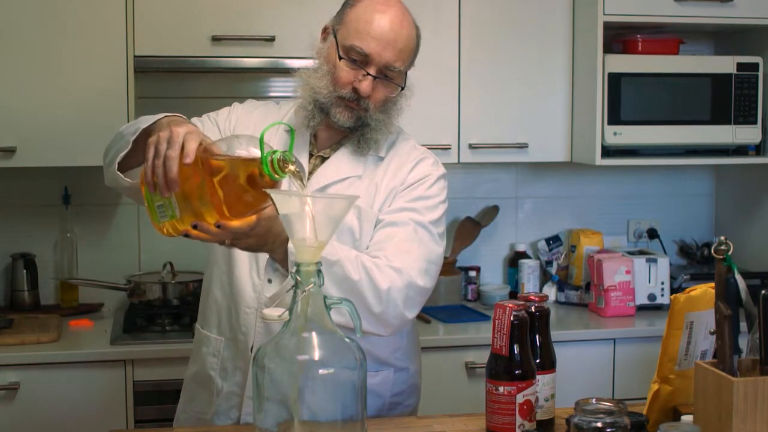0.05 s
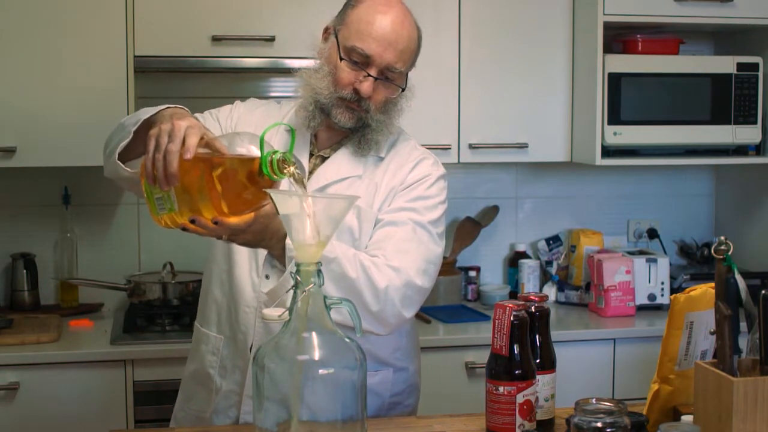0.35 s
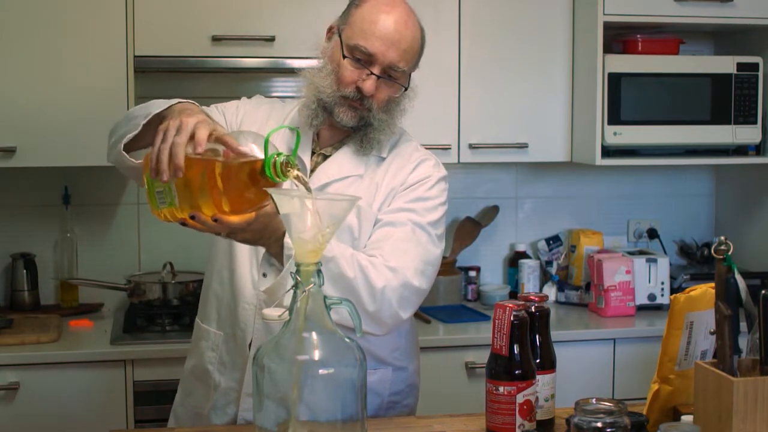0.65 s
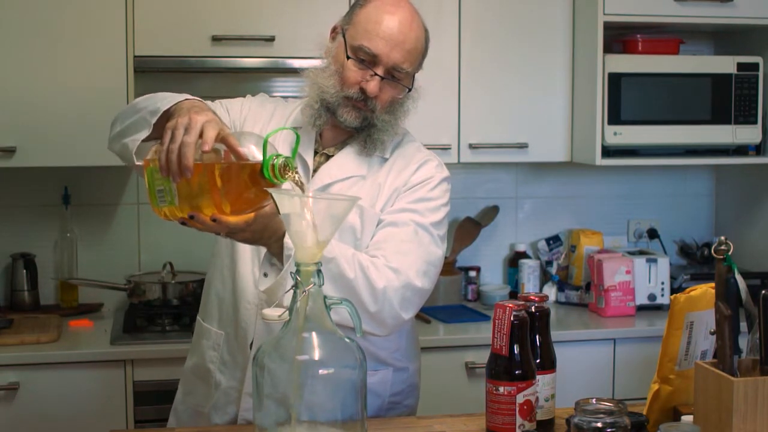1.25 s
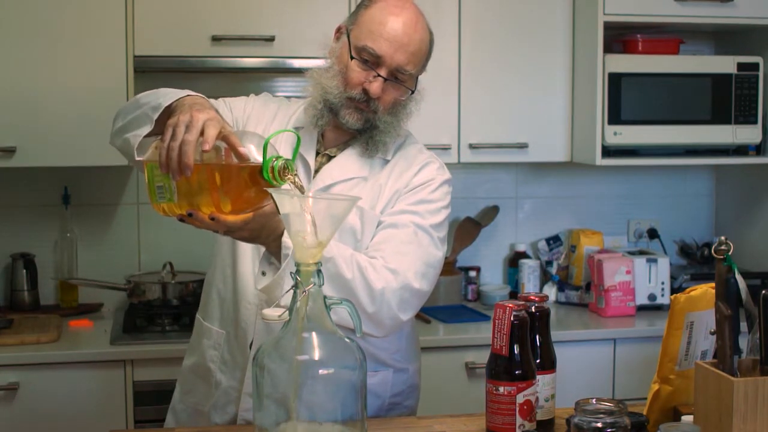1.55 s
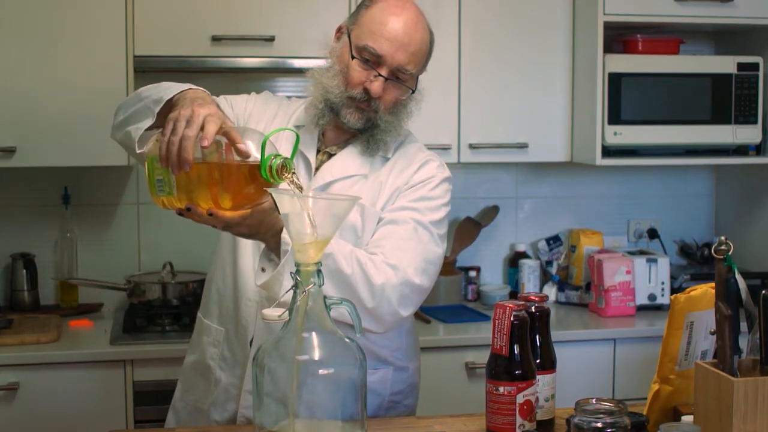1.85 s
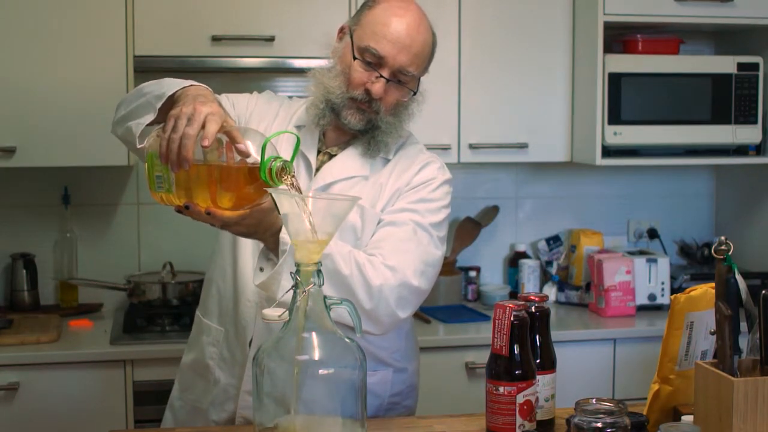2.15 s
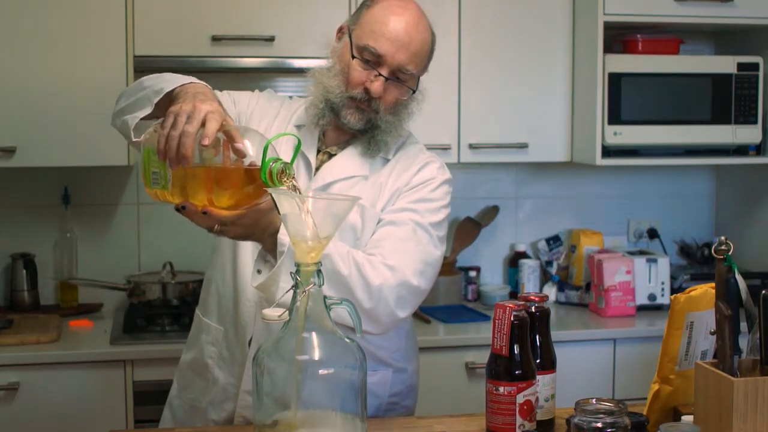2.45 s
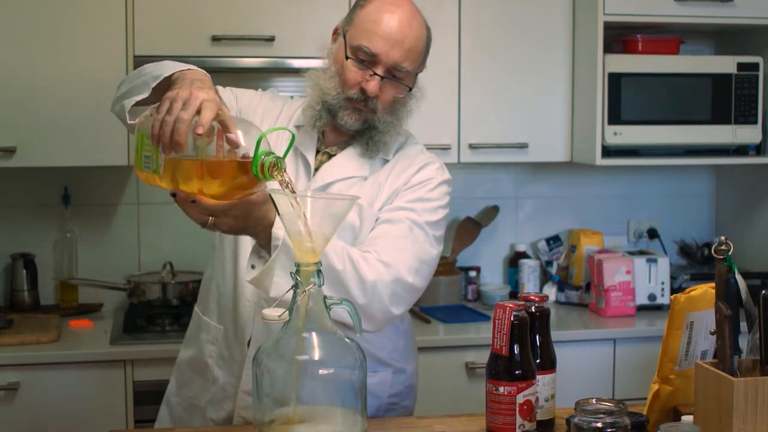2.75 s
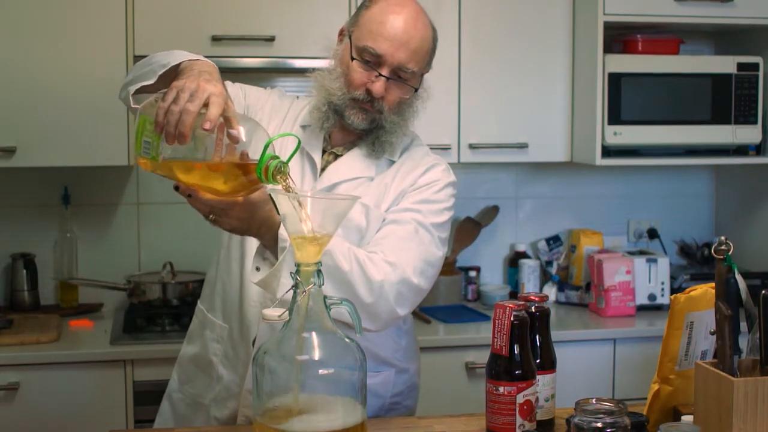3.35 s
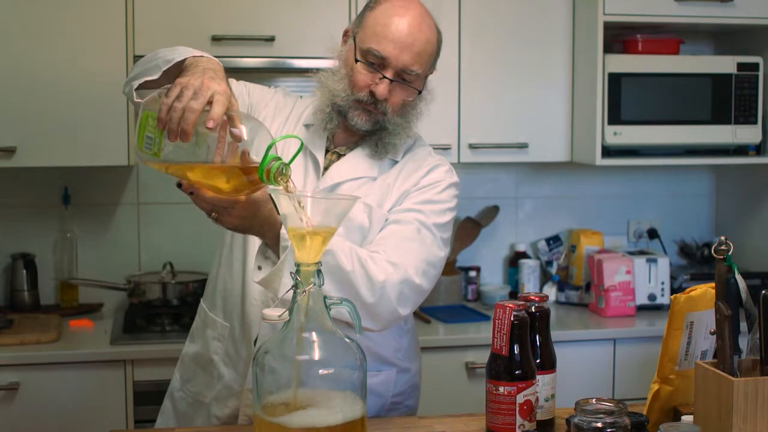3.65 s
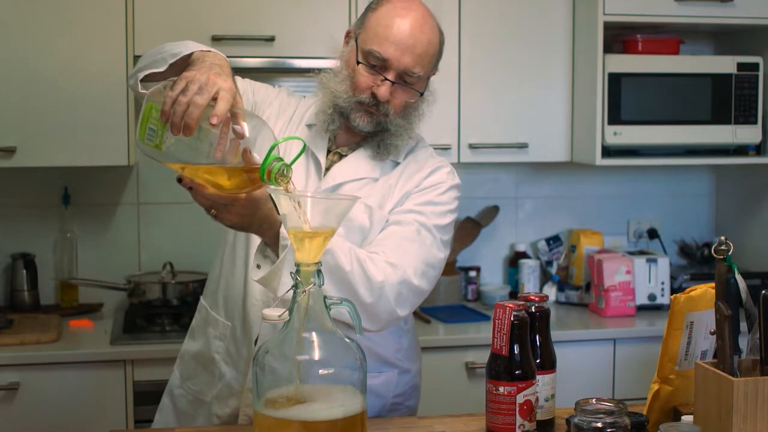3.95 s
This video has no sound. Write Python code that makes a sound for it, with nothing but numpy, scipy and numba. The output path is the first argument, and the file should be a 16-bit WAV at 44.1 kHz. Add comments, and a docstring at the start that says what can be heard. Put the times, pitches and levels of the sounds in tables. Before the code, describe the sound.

Liquid gurgles hollowly through a plastic funnel into a glass jug, with light splashing.

```python
"""A kitchen, heard by two spaced microphones: juice pours from a bottle through a plastic funnel
into a big glass jar. The stream drags air into the pool in the funnel, where large bubbles gulp and
churn, deeper as the pool grows, and ring the hollow air resonances. Splash and fizz ride on top,
dotted with plinks, spatters and one dry click. They die down as the jar fills and a thin trickle
comes through. A low thrum sits under it all."""
import sys
import numpy as np
from scipy import signal
from scipy.fft import rfft, irfft
from scipy.io import wavfile
from scipy.ndimage import uniform_filter1d, map_coordinates
from numba import njit

SR = 44100
rng = np.random.default_rng(int(sys.argv[2]) if len(sys.argv) > 2 else 0)


def inscribe(sig):
    """Save sig as 16-bit PCM at rate SR to the path in sys.argv[1].

    A 1-D sig is mono; a 2-D sig holds one channel per row.
    Samples are clipped to [-1, 1] before scaling.
    """
    pcm = np.round(np.clip(np.atleast_2d(sig).T, -1, 1) * 32767)
    wavfile.write(sys.argv[1], SR, pcm.astype(np.int16))


N = 176400

# Churn of the pool in the funnel: time_s, level_db, pitch_hz
POOL_CHURN = [(0, -37.5, 258), (.35, -39.5, 274), (.7, -29, 290), (1.15, -29.5, 278.5), (1.45, -28, 259),
              (1.9, -27, 230), (2.55, -23.5, 227), (2.85, -30, 192), (3.3, -30, 185.5), (4, -30.5, 193)]
# Air resonances of jar and surroundings, with the start and end level of the stream's own ring:
# pitch_hz, width_hz, left_db, right_db, start_db, end_db
AIR_MODES = [(174.2, 3.7, -6, -3, -43.5, -26), (250.3, 8.9, 0, -5.5, -26.5, -31),
             (370.4, 35.6, -8.5, 1, -44.5, -36)]
# Fader for the burble of mid-sized bubbles: time_s, level_db
BURBLE_FADER = [(0, -43.5), (.3, -39.5), (.8, -36.5), (1.12, -40.5), (1.5, -38.5), (2.1, -40.5),
                (2.85, -41.5), (4, -42)]
# Faders for the fine spray: time_s, splash_db, fizz_db
SPRAY_FADERS = [(0, -31.5, -44.5), (.12, -38, -49), (.4, -35, -48.5), (.55, -41.5, -50), (.75, -39.5, -49),
                (.95, -39, -48.5), (1.08, -44, -53), (1.2, -44.5, -53.5), (1.35, -35, -47.5),
                (1.5, -43.5, -54), (1.79, -39.5, -51), (1.9, -35, -50.5), (2.02, -40, -51.5),
                (2.42, -43, -55.5), (2.8, -43, -54), (2.92, -47, -54), (3.3, -53, -57.5), (4, -61, -58.5)]
# Tone of the burble, the splash and the fizz: frequency_hz, gain_db
BURBLE_EQ = [(300, 20.5), (450, -5.5), (550, 0.5), (700, -1.5), (900, -7), (1200, -11.5), (1600, -18.5),
             (2200, -11), (3000, -25)]
SPLASH_EQ = [(700, 28.5), (900, 0), (1150, -9), (1700, -3.5), (2150, -0.5), (2550, -4), (3100, -4),
             (3500, -2), (4100, -11.5), (5400, -13), (6400, -18.5), (8000, -5)]
FIZZ_EQ = [(4500, -1), (6300, -11.5), (8000, -7), (10000, -7.5), (12500, -12.5), (15500, -19)]
# Cavity resonances that colour the splashing: pitch_hz
CAVITY_MODES = [446, 559, 619, 866, 970, 1117, 1337, 1470, 1970, 2190]
# Tone of the falling liquid's thrum and of the quiet kitchen: frequency_hz, gain_db
THRUM_EQ = [(20, -7), (45, 1.5), (72, 13), (90, 5), (125, 11.5), (170, 8), (300, -39)]
ROOM_TONE_EQ = [(20, 2), (100, 7), (500, -1), (2000, -16.5), (6000, -28), (16000, -55)]
# Drops hitting the funnel: peak_s, level_db, centre_hz, decay_s
SPATTER_HITS = [(0.011, -27.5, 1410, 0.016), (.29, -47, 1700, 0.025), (.38, -48.5, 3250, 0.083),
                (1.795, -37, 5900, 0.0072), (1.922, -31, 1070, 0.027), (1.932, -32, 4400, 0.013),
                (2.85, -33.5, 3960, 0.018), (2.976, -36, 890, 0.0064), (3.604, -24.5, 700, 0.0021)]
# Bunches of clear bubbles: start_s, level_db, pitch_hz
PLINK_BUNCHES = [(.165, -27, 1400), (.293, -26, 2150), (.822, -25.5, 1526), (.99, -30, 1586),
                 (1.925, -23, 1950), (2.108, -34.5, 2140), (2.22, -32, 5500), (2.848, -33.5, 4920),
                 (3.866, -35, 1390)]
# Big gulps of air, positive pan to the left: peak_s, level_db, pitch_hz, pan_db
AIR_GULPS = [(.439, -23, 257, 3), (.464, -19.5, 290, 2), (0.718, -18.5, 260, 4), (.768, -8.5, 350, -4),
             (.814, -16, 262, 5), (0.942, -16, 265, 12), (0.968, -15.5, 257, 3), (1.01, -16, 322, 9),
             (1.247, -16.5, 335, -3), (1.316, -10, 270, 4), (1.337, -12.5, 267, 1), (1.397, -10, 250, 6),
             (1.443, -17, 242, 9), (1.479, -12.5, 234, 19), (1.498, -12.5, 232, 3), (1.536, -12, 265, 2),
             (1.548, -14.5, 252, 5), (1.57, -6.5, 265, 5.5), (1.652, -9.5, 253, 2.5),
             (1.732, -14.5, 246, 3), (1.794, -11, 248, 0), (1.816, -12, 259, 6), (1.832, -21, 254, -8),
             (1.885, -15, 230, 12), (1.913, -10, 235, 6), (1.967, -16.5, 235, 18), (2.035, -7.5, 237, 6),
             (2.061, -3, 248, 3), (2.148, -14, 245, 4), (2.245, -9, 252, 18), (2.297, -14.5, 245, 4),
             (2.308, -11.5, 254, 16), (2.352, -19.5, 250, -9), (2.391, -13, 250, 12),
             (2.432, -14.5, 237, 10), (2.467, -8.5, 257, 5), (2.481, -13, 251, 0), (2.522, -16.5, 252, 7),
             (2.568, -6, 250, -2), (2.696, -10, 246, 3), (2.977, -22.5, 235, -8), (3.038, -20.5, 208, 1),
             (3.085, -17, 224, -5), (3.156, -13, 244, 10), (3.253, -14, 245, 4), (3.324, -16, 253, -2),
             (3.374, -15.5, 256, 7), (3.402, -19.5, 243, 7), (3.542, -26, 239, 11), (3.694, -17, 236, -6),
             (3.752, -19.5, 215, -17)]
# Fader for the trickle in the jar: time_s, level_db
TRICKLE_FADER = [(2, -67), (2.7, -54), (3.3, -48.5), (4, -58)]


def undb(db):
    """Decibels to gain."""
    return 10 ** (np.asarray(db) / 20)


def unit(x):
    """Scale to rms 1."""
    return x / np.sqrt(np.mean(x ** 2))


def curve(table, t, column=1):
    """One column of a table, joined by straight lines."""
    rows = np.array(table)
    return np.interp(t, rows[:, 0], rows[:, column])


def wobble(per_s):
    """Random levels, smoothly joined; spread near 1."""
    hold = max(int(SR / per_s), 1)
    steps = rng.standard_normal(N)
    return 1.2 * uniform_filter1d(steps[np.arange(N) // hold], hold)


def equalise(x, points):
    """Shape the tone with an EQ curve, then scale to rms 1."""
    hz, db = np.array(points).T
    bins_hz = np.maximum(np.arange(N + 1) * SR / (2 * N), 1)
    gain = undb(np.interp(np.log(bins_hz), np.log(hz), db))
    return unit(irfft(rfft(x, 2 * N) * gain)[..., :N])


def resonate(x, hz, width_hz):
    """Two-pole resonance, gain 1 at the centre."""
    return signal.lfilter(*signal.iirpeak(hz, hz / width_hz, fs=SR), x)


def noise_band(hz, first_width_hz, second_width_hz):
    """Stereo noise through two resonances in series, at rms 1."""
    band = resonate(rng.standard_normal((2, N)), hz, first_width_hz)
    return unit(resonate(band, hz, second_width_hz))


def room(x, wet_db, t60_s=0.5, predelay_s=0.001435):
    """Add the kitchen's reflections, different at each microphone."""
    t = np.arange(SR // 2) / SR
    tail = rng.standard_normal((2, len(t))) * 1e-3 ** (t / t60_s) * (t > predelay_s)
    tail /= np.sqrt(np.sum(tail ** 2, axis=1, keepdims=True))
    return x + undb(wet_db) * signal.fftconvolve(x * np.ones((2, 1)), tail, axes=1)[:, :N]


@njit
def bubbles(starts, hz, size, decay_cycles, glide_per_s):
    """Each bubble swells quickly, then rings down while its pitch rises."""
    out = np.zeros(N)
    for k, start in enumerate(starts):
        decay_s = decay_cycles / hz[k]
        for i in range(max(0, int(start * SR) + 1), min(N, int((start + 6 * decay_s) * SR))):
            age = i / SR - start
            envelope = (1 - np.exp(-6 * (age / decay_s) ** 2)) * np.exp(-age / decay_s)
            turns = hz[k] * age * (1 + glide_per_s[k] * age / 2)
            out[i] += size[k] * envelope * np.sin(2 * np.pi * turns)
    return out


def swarm(per_s, pitch, decay_cycles, scatter_db, spread_s=0.001525):
    """A stereo cloud of bubbles; pitch(time, u) gives each its Hz from a random u in 0..1."""
    count = int(per_s * N / SR)
    when, which, strength, place = np.random.default_rng(rng.integers(2 ** 31)).random((count, 4)).T
    starts = (np.arange(count) + 2 * when) / per_s
    hz = pitch(starts, which)
    size = undb(-scatter_db * np.log(np.maximum(strength, .015))) * np.sqrt(hz)
    glide = 0.035 * hz / decay_cycles  # 3.5 % up per decay time
    lag = spread_s * (place - .5)
    sides = [bubbles(starts + side * lag, hz, size, float(decay_cycles), glide) for side in (1, -1)]
    return unit(np.array(sides))


def churn_swell_db(t):
    """The churn's fader about its average, for other layers to follow."""
    level_db = curve(POOL_CHURN, t)
    return level_db - level_db.mean()


def churn(t):
    """Lesser gulps tumble in uneven surges, lower as the pool deepens."""
    def pitch(at, u):
        octaves = 0.23 * np.arctanh(1.96 * (u - .5))
        return curve(POOL_CHURN, at, column=2) * 2 ** octaves

    tumble = swarm(130, pitch, decay_cycles=1.73, scatter_db=-0.5, spread_s=0.0048)
    tumble = unit(room(tumble, wet_db=-10.5))
    return tumble * undb(curve(POOL_CHURN, t) + 2 * wobble(per_s=30))


def hollow(gurgle, t, drift=0.025, follow=0.44):
    """Air resonances rung by the gurgle and by the stream itself; the lowest grows through the pour."""
    out = 0
    for hz, width_hz, left_db, right_db, start_db, end_db in AIR_MODES:
        ring = noise_band(hz, width_hz, 2 * width_hz)
        varispeed = np.cumsum(1 + drift * wobble(per_s=7))  # makes the pitch waver
        wavering = np.array([map_coordinates(side, [varispeed], mode="mirror") for side in ring])
        ring_db = np.linspace(start_db, end_db, N) + follow * churn_swell_db(t)
        gurgle_ring = undb(1) * resonate(gurgle, hz, width_hz)
        out += (gurgle_ring + undb(ring_db) * wavering) * undb([[left_db], [right_db]])
    return out


def spray(t, surges_per_s=70):
    """Three sizes of bubble where the wobbling stream lands: burble, splash and fizz."""
    burble = swarm(600, lambda at, u: 400 + 1700 * u ** 2, decay_cycles=2.92, scatter_db=2.5)
    splash = swarm(1200, lambda at, u: 850 + 5600 * u, decay_cycles=10, scatter_db=2.9)
    fizz = swarm(2300, lambda at, u: 5000 + 11000 * u, decay_cycles=2.9, scatter_db=2.9)
    shared_surge_db = 1.3 * wobble(surges_per_s)

    def layer(cloud, eq, fader_db):
        shaped = equalise(room(cloud, wet_db=1.5), eq)
        own_surge_db = 1.6 * wobble(surges_per_s)
        return shaped * undb(fader_db + shared_surge_db + own_surge_db)

    out = (layer(burble, BURBLE_EQ, curve(BURBLE_FADER, t) + 3.5)
           + layer(splash, SPLASH_EQ, curve(SPRAY_FADERS, t) + 2.5)
           + layer(fizz, FIZZ_EQ, curve(SPRAY_FADERS, t, column=2) + 2.5))
    cavity_ring = sum(resonate(out, hz, width_hz=13.8) for hz in CAVITY_MODES)
    return out + undb(-10) * cavity_ring


def thrum(t, follow=0.93, growth_db_per_s=1.5):
    """The low end of the falling liquid swells with the churn and slowly builds."""
    level_db = -41.5 + follow * churn_swell_db(t) + growth_db_per_s * (t - t.mean())
    return equalise(rng.standard_normal((2, N)), THRUM_EQ) * undb(level_db)


def room_tone():
    """The quiet kitchen: a steady bed of dark noise."""
    return undb(-39) * equalise(rng.standard_normal((2, N)), ROOM_TONE_EQ)


def spatters(t):
    """Drops slap the funnel in short bursts, quicker to rise than to fade."""
    out = 0
    for peak_s, db, hz, decay_s in SPATTER_HITS:
        width_hz = 0.89 * hz
        envelope = np.exp(-abs(t - peak_s) / np.where(t < peak_s, 0.43 * decay_s, decay_s))
        out += undb(db) * noise_band(hz, width_hz, width_hz) * envelope
    return room(out, wet_db=-11)


def plinks(count=6, gap_s=0.0043, detune=0.081, decay_cycles=6.7, glide_per_s=3.5):
    """Small bunches of clear bubbles ring in quick, loose succession."""
    start_s, db, hz = np.array(PLINK_BUNCHES, float).T[:, :, None]
    late, sharp = rng.standard_normal((len(PLINK_BUNCHES), 2, count)).transpose(1, 0, 2)
    starts = (start_s + gap_s * np.arange(count) * np.exp(late / 4)).ravel()
    pitches = (hz * (1 + detune * sharp)).ravel()
    sizes = np.repeat(undb(db), count)
    rings = bubbles(starts, pitches, sizes, decay_cycles, np.full(len(pitches), glide_per_s))
    return room(rings, wet_db=-12.5)


def gulps(t, glide_per_s=0.59, slap_decay_s=0.01):
    """Big air pockets swell and collapse in a few cycles; liquid closes over each with a wet slap."""
    out, slap_envelope = np.zeros((2, N)), np.zeros(N)
    for peak_s, db, hz, pan_db in AIR_GULPS:
        phase, place = rng.standard_normal(2)
        near = abs(t - peak_s) < .1
        lag_s = .0007 + .0005 * place  # between the microphones
        age = t[near] - peak_s - np.array([[lag_s], [-lag_s]]) / 2
        briefness = np.sqrt(2) * (hz / 249) ** 2.6  # higher gulps are shorter
        slope_s = np.where(age < 0, 0.0042, 0.0063) / briefness
        swell = 1 / np.cosh(age / slope_s)
        pan = unit(undb(np.array([[pan_db], [-pan_db]]) / 2))
        turns = phase + hz * age * (1 + glide_per_s * age / 2)
        out[:, near] += undb(db + 1.2) * pan * swell * np.sin(2 * np.pi * turns)
        slap_envelope[near] += undb(db - 23) * np.exp(-abs(t[near] - peak_s) / slap_decay_s)
    slaps = slap_envelope * noise_band(500, 264, 264)
    return room(out + slaps, wet_db=-14)


def click(t, start_s=1.5327, level_db=-14, decay_s=0.0008):
    """A single sharp, dry click."""
    return undb(level_db) * (t > start_s) * np.exp(-abs(t - start_s) / decay_s)


def trickle(t, centre_hz=1493, range_hz=414):
    """Like-sized bubbles from the thin stream under the funnel ring in the filling jar."""
    drips = swarm(90, lambda at, u: centre_hz + range_hz * (u - .5), decay_cycles=12.7, scatter_db=2.5)
    return unit(room(drips, wet_db=1.5)) * undb(curve(TRICKLE_FADER, t))


def scene():
    """The whole pour, mixed at both microphones."""
    t = np.arange(N) / SR
    gurgle = gulps(t) + churn(t)
    pour = gurgle + hollow(gurgle, t) + spray(t) + plinks() + spatters(t) + trickle(t)
    return pour + click(t) + thrum(t) + room_tone()


def record(dry, top_hz=15750):
    """Clip at full scale, then cut the top with a steep low-pass."""
    low_pass = signal.ellip(10, .2, 80, top_hz, fs=SR, output="sos")
    return signal.sosfilt(low_pass, np.clip(dry, -1, 1))


dry = scene()
out = record(dry)
inscribe(out)
```